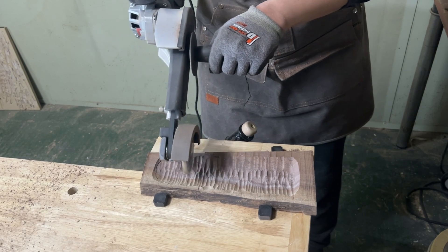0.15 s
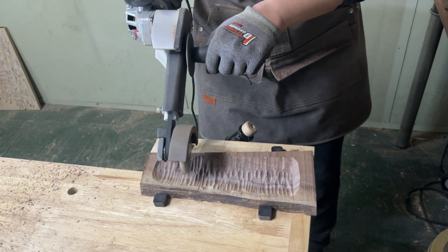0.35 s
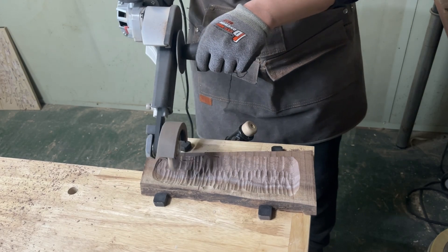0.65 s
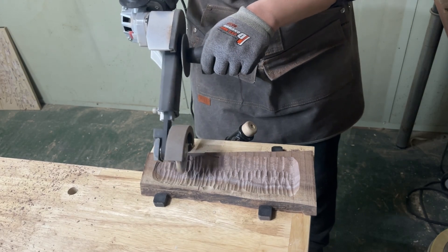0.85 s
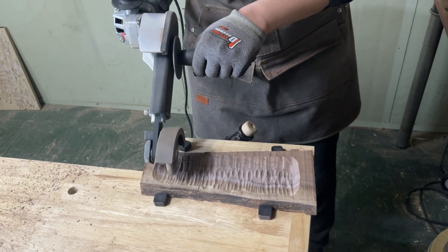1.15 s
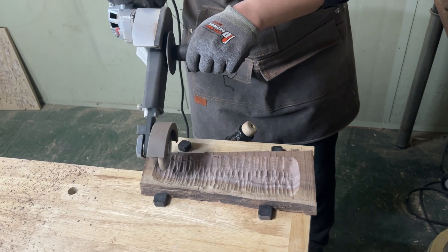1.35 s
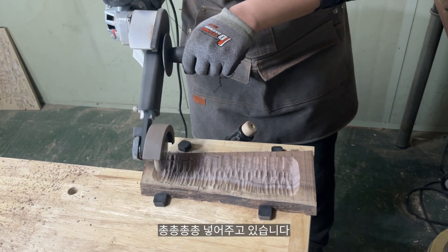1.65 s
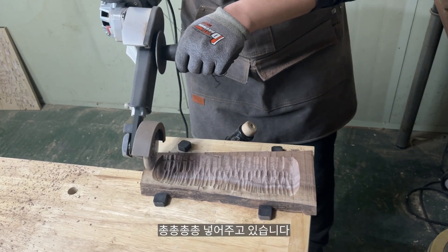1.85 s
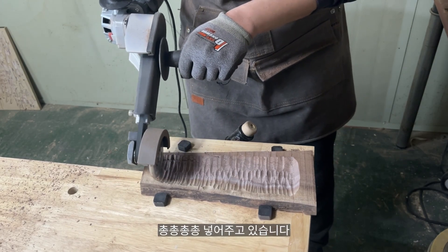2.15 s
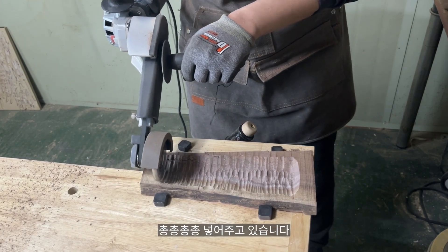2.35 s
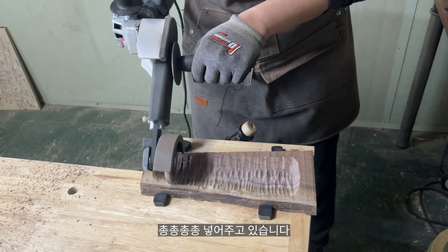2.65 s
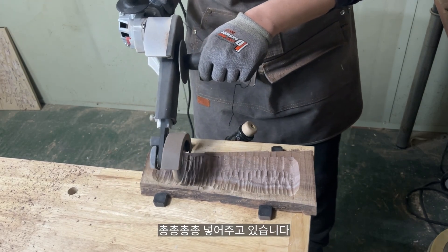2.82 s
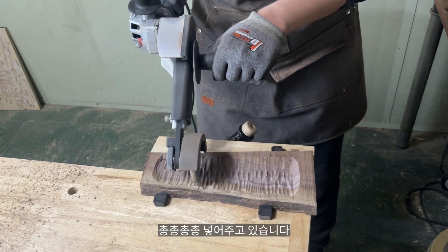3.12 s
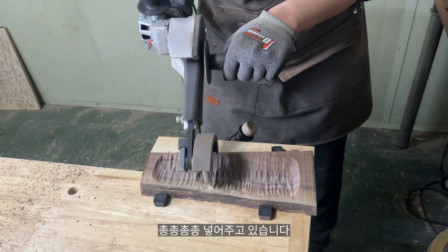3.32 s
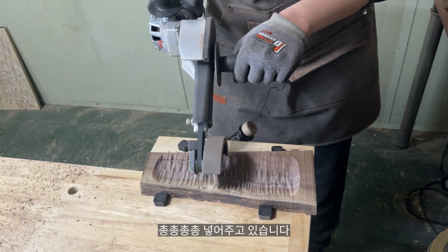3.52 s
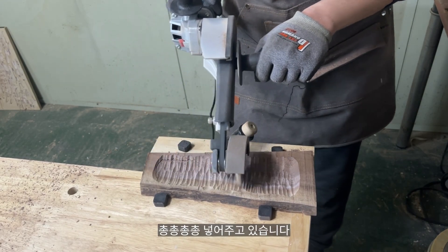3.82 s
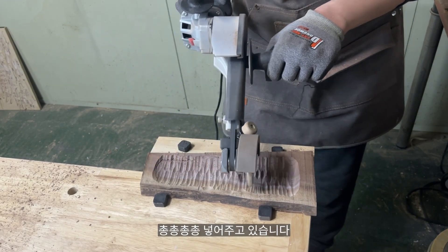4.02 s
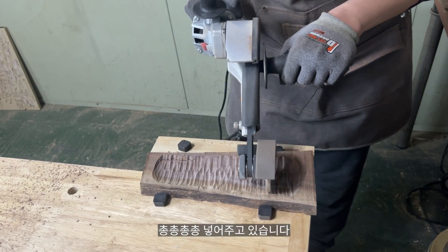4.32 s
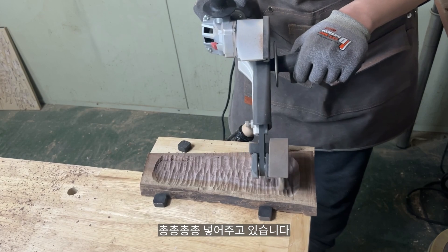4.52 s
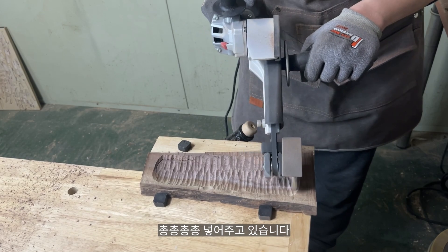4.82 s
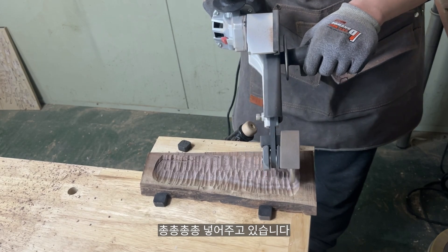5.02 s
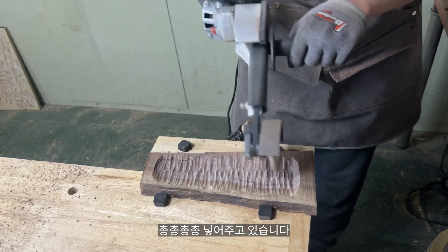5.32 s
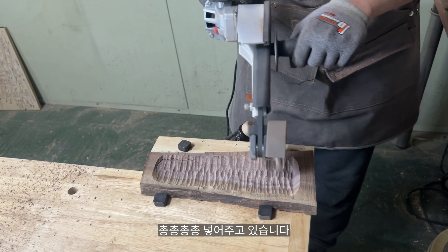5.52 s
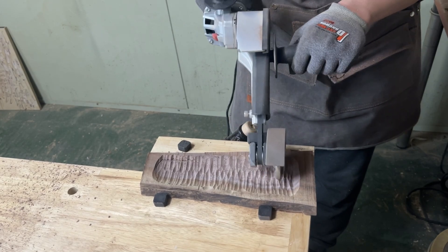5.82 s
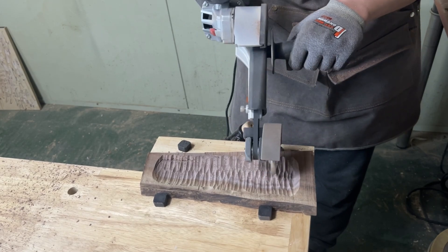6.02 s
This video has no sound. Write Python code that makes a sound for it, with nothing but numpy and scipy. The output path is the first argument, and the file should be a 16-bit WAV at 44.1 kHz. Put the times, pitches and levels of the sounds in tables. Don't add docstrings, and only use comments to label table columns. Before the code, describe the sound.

Close mono-like pickup of a power carver on wood: continuous turbulent hiss and faint piercing whine, with short woody brrt-like cuts on top. Widely spaced cuts come first, then a squealing hard group, a tiny scuff of the plank, a fast regular run of knocking bites, and finally light scattered dabs. Each cut briefly drags the motor down; a short, dull room reflection surrounds everything.

```python
import sys
import numpy as np
from scipy import signal
from scipy.fft import rfft, irfft, next_fast_len
from scipy.io import wavfile
from scipy.ndimage import uniform_filter1d

SR = 44100
rng = np.random.default_rng(int(sys.argv[2]) if len(sys.argv) > 2 else 0)


def bounce(signal):
    frames = np.transpose(np.atleast_2d(signal))
    limited = np.clip(frames, -1, 1)
    pcm = np.round(limited * 32767).astype(np.int16)
    wavfile.write(sys.argv[1], SR, pcm)


def voltage_ratio(decibels):
    exponent = np.asarray(decibels, float) / 20
    return 10 ** exponent


N = 272097


def rms_one(x):
    return x / np.sqrt(np.mean(x ** 2) + 1e-20)


def in_time(rows):
    seconds, *columns = np.transpose(rows)
    return [np.interp(np.arange(N) / SR, seconds, column) for column in columns]


def drift(rate_hz):
    r = np.exp(-80 * np.pi * rate_hz / SR)
    noise = rng.standard_normal(N // 40 + 2002)
    slow = signal.lfilter([1], [1, -2 * r, r * r], noise)[2000:]
    return np.interp(np.arange(N) / 40, np.arange(len(slow)), rms_one(slow))


def resonance(x, hz, width_hz):
    r = np.exp(-np.pi * width_hz / SR)
    zeros = np.array([1, 0, -1]) * (1 - r * r) / 2
    return signal.lfilter(zeros, [1, -2 * r * np.cos(2 * np.pi * hz / SR), r * r], x)


def body(x, modes):
    total = 0
    for k, (hz, width_hz, db) in enumerate(modes):
        total = total + (-1) ** k * voltage_ratio(db) * resonance(x, hz, width_hz)
    return total


def turns(hz):
    return 2 * np.pi * np.cumsum(hz) / SR


def workshop(x):
    size = next_fast_len(N + SR)
    hz = np.fft.rfftfreq(size, 1 / SR)
    t60_s = 0.2 / (1 + hz / 6000)
    echo = 0
    for k, lag_s in enumerate(rng.uniform(.009, .031, 8)):
        loop = voltage_ratio(-60 * lag_s / t60_s) * np.exp(-2j * np.pi * hz * lag_s)
        echo = echo + (-1) ** k * loop / (1 - loop)
    return irfft(rfft(x, size) * echo, size)[:N]


def ear_differences():
    per_second, level_db, width_hz = 5.7, -51, 1500
    side = np.zeros(N + 2048)
    swell = signal.windows.kaiser(2048, 4 * np.pi) ** .5
    for when, where, size in rng.random((round(per_second * N / SR), 3)):
        hz = 5200 + 9800 * where
        edges = [hz - width_hz / 2, hz + width_hz / 2]
        band = signal.butter(4, edges, "band", fs=SR, output="sos")
        noise = signal.sosfilt(band, rng.standard_normal(2048))
        at = 521 + 1024 * int(when * (N // 1024 - 1))
        side[at:at + 2048] += voltage_ratio(level_db + 8 * size - 3) * rms_one(noise) * swell
    return side[1024:N + 1024]


# centre in seconds, pitch in Hz, level in dB,
# half length in seconds.
SCUFFS = [
    (2.868, 275, -65, .025),
    (2.912, 350, -66, .018),
    (2.845, 500, -70, .025),
    (2.95, 500, -69, .012),
]


def scuffs():
    t, noise = np.arange(N) / SR, rng.standard_normal(N)
    total = 0
    for centre, hz, db, half in SCUFFS:
        rub = resonance(resonance(noise, hz, 189), hz, 204)
        total = total + voltage_ratio(db) * rms_one(rub) * np.exp(-((t - centre) / half) ** 2)
    return total


# frequency in Hz, density in dB per Hz.
HISS = [(59, -80), (100, -30), (159, -28), (387, -27), (1090, -17.5), (1320, -18), (1460, -16.5),
        (2640, -9.5), (2880, -5.5), (5420, 0.5), (6290, -2.5), (7930, 0), (13200, -7.5), (15600, -11)]
# frequency in Hz, width in Hz, level in dB.
HOUSING = [(5580, 350, -11), (6280, 320, -9), (13130, 1330, -2), (14400, 710, -8), (11540, 340, -10),
           (11360, 400, -15), (10600, 400, -10)]


def air_hiss(spindle, hiss_db, top_db, rumble_db, fan_db):
    out, together = 0, drift(6.0)
    edges = 50 * 2 ** np.arange(0, 8.5, 1 / 3)
    white = rng.standard_normal((2, N))
    hz, db = np.transpose(HISS)
    for k, (low, high) in enumerate(zip(edges, edges[1:])):
        third = signal.butter(2, [low, high], "band", fs=SR, output="sos")
        band = signal.sosfilt(third, white[k % 2])
        level_db = np.interp(np.log(low * high) / 2, np.log(hz), db)
        level_db = level_db + top_db * (low > 11000) + rumble_db * (high < 2500)
        out = out + band * voltage_ratio(level_db + 0.2 * together + 0.59 * drift(2.6))
    out = out + body(out, HOUSING) + voltage_ratio(fan_db - 7.5) * resonance(out, 8130, 450)
    sparks = voltage_ratio(0.53 * drift(200.0))
    throb = 1 + 0.068 * np.cos(spindle)
    return voltage_ratio(hiss_db - 0.5) * rms_one(out * sparks * throb)


GEAR_TEETH = 70
# multiple of the spindle speed, level in dB.
GEAR_ORDERS = [(1, -84), (14, -68.5), (21, -64.5)]
# multiple of the wheel speed, level in dB.
IDLE_ORDERS = [(2, -84), (6, -60), (8, -89)]


def whines(spindle, wheel, mesh_db, gear_db, idle_db):
    lines = [(GEAR_TEETH * spindle, mesh_db), (7 * spindle, gear_db), (3 * wheel, idle_db)]
    lines += [(order * spindle, db) for order, db in GEAR_ORDERS]
    lines += [(order * wheel, db) for order, db in IDLE_ORDERS]
    total = 0
    for phase, db in lines:
        level = np.sqrt(2) * voltage_ratio(db + 1.3 * drift(1.8))
        total = total + level * np.sin(phase + 0.11 * drift(32.0))
    return total


# start in seconds, ring level in dB,
# tooth-rate thud level in dB, chip hiss level in dB, length in seconds.
CUTS_END = [(.032, -26, -45, -34, .011), (.2626, -29, -45.5, -37, 0.018), (.497, -23, -47, -33.5, 0.0066),
            (.77, -27, -42, -29.5, .019), (.794, -33, -51, -36, .012), (.985, -23, -43, -29.5, .011),
            (.9986, -38, -51.5, -38.5, 0.012), (1.1673, -34.5, -48, -36, .017),
            (1.697, -41, -49, -35.5, 0.014), (1.9934, -37, -49, -36, 0.022),
            (2.1943, -31.5, -52.5, -34, .012)]
CUTS_KNOT = [
    (1.438, -28, -48, -30.5, 0.01),
    (2.208, -30.5, -52, -33.5, 0.022),
    (2.3604, -24, -44.5, -30, 0.0096),
    (2.503, -26, -47, -29.5, 0.0099),
    (2.522, -37, -56, -35, 0.0107),
    (2.6405, -21.5, -47, -30.5, 0.00629),
    (2.7661, -27, -51, -33, 0.0099),
]
CUTS_MIDDLE = [
    (2.8954, -28.5, -43.5, -34.0, 0.009),
    (3.029, -25.5, -45, -37.0, 0.0096),
    (3.143, -31, -49.0, -38.0, 0.022),
    (3.275, -28.5, -43, -33.5, 0.008),
    (3.3982, -26, -42.5, -34.0, 0.0074),
    (3.519, -33.5, -45.0, -36.0, 0.01149),
    (3.6327, -28, -44, -32, 0.0096),
    (3.744, -31.5, -49, -39, 0.011),
]
CUTS_FAR = [
    (3.8344, -35.5, -55.5, -37, 0.011),
    (3.9516, -27, -46.5, -33.5, 0.011),
    (4.0901, -29.5, -47, -36.5, 0.011),
    (4.21, -32, -45.0, -33.0, 0.011),
    (4.331, -31.5, -43.5, -36.5, 0.0098),
    (4.439, -30.5, -45.0, -35.0, 0.012),
    (4.54, -34.5, -44, -34.5, 0.01065),
    (4.64, -28.5, -43.5, -35, 0.0072),
    (4.7388, -26, -37, -32.5, 0.0064),
]
CUTS_LIGHT = [
    (4.8378, -36.0, -44.5, -38, 0.0061),
    (4.9456, -38, -50, -37, 0.012),
    (5.057, -35.5, -48, -37, 0.0069),
    (5.266, -41, -46.5, -45.5, 0.011),
    (5.29, -58, -52.5, -50, 0.0081),
    (5.6341, -39, -45, -37.0, 0.014),
    (5.836, -38, -48, -35.5, 0.017),
    (6.0667, -35, -40, -32, 0.01),
]
# plank ring in Hz, hollow knock level in dB, tooth unevenness 0-1.
STRETCHES = [
    (3100, -43, 0.78),
    (3440, -44, 0.8),
    (3178, -43.5, 0.55),
    (2597, -45.5, 0.67),
    (2700, -49, 0.34),
]


def all_cuts():
    runs = [CUTS_END, CUTS_KNOT, CUTS_MIDDLE, CUTS_FAR, CUTS_LIGHT]
    return [(*cut, *wood) for run, wood in zip(runs, STRETCHES) for cut in run]


def pressure(length, t, rise, fall):
    return np.clip(t / rise, 0, 1) * np.exp(-np.clip(t - length, 0, 1) / fall)


# time in seconds, gear whine in Hz.
FREE_SPEED = [(0, 11805), (.65, 11935), (1.2, 11960), (1.7, 11955), (2.2, 11985), (2.5, 11920),
              (3.2, 11885), (3.7, 11965), (4.2, 11915), (4.7, 11830), (5.1, 11935), (5.6, 11935),
              (6.17, 11925)]


def motor_hz():
    drag_hz, drag_in_s, recover_s = 87.5, .025, .17
    hz, t = in_time(FREE_SPEED)[0], np.arange(N) / SR
    for start, _, thud_db, chip_db, length, *_ in all_cuts():
        hardness = voltage_ratio(.62 * (thud_db + 46) + .5 * (chip_db + 35))
        drag = drag_hz * hardness * (length / .01) ** .73
        hz = hz - drag * pressure(0, t - start, drag_in_s, recover_s)
    return hz


def belt_slip():
    slip, t = np.zeros(N), np.arange(3500) / SR
    for start, _, thud_db, _, length, *_ in all_cuts():
        at = round(start * SR)
        lag = .007 * voltage_ratio(thud_db + 43) * pressure(length, t, .009, .005)
        slip[at:at + len(t)] += lag[:N - at]
    return np.clip(slip, 0, .04)


def tooth_blows(turn, uneven):
    orders = np.arange(1, 36)[:, None]
    share = np.where(orders % 3 == 0, 1, np.clip(uneven, .05, 1))
    grain = voltage_ratio(1.95 * rng.standard_normal(orders.shape))
    smear = 1.2 * rng.standard_normal(orders.shape)
    return rms_one(np.sum(share * grain * np.cos(orders * turn + smear), axis=0))


# start of the cut in seconds, pitch in Hz, level in dB.
SQUEALS = [(.032, 6620, -41), (.497, 5350, -34), (.77, 9270, -38), (1.167, 5270, -34), (1.438, 9200, -37.5),
           (1.438, 6800, -34.5), (2.208, 6570, -33.5), (2.36, 6630, -29), (2.36, 9400, -36),
           (2.503, 15040, -31), (2.522, 9000, -33), (2.641, 8730, -28), (2.641, 12100, -25),
           (2.765, 9310, -30.5), (2.765, 11920, -24), (3.029, 5265, -37), (3.143, 5310, -38),
           (3.275, 5290, -33.5), (3.399, 5294, -31.5), (3.519, 4780, -34.5), (3.744, 5280, -35),
           (3.834, 5330, -29.5), (3.834, 4000, -37), (3.952, 5270, -29), (4.21, 3480, -35),
           (4.331, 6620, -38), (4.54, 4060, -42), (4.54, 6600, -41), (4.64, 4040, -34.5),
           (4.739, 4024, -40)]


def guard_squeals(start, force):
    near = [row for row in SQUEALS if abs(row[0] - start) < .007]
    return sum(voltage_ratio(db + 8.5) * resonance(force, hz, 510) for _, hz, db in near)


# frequency in Hz, width in Hz, level in dB.
GUARD = [(4044, 300, 2), (5330, 240, 1.5), (6620, 420, 5), (8440, 560, 8), (9050, 1440, 5),
         (11870, 1030, 4), (14300, 2000, -1)]
PLANK = [(1275, 130, 2), (2246, 210, -0.5), (1810, 300, -7)]
HOLLOW = [(445, 22, -3), (940, 710, 1), (1230, 250, -8), (635, 220, -26)]
BENCH = [(163, 280, -14), (322, 340, -7.5), (560, 110, -3.5), (980, 214, 7.5), (1897, 45, 10)]


def cuts(wheel):
    out, t = np.zeros(N + 4000), np.arange(4000) / SR
    wheel = np.pad(wheel, (0, len(t)), "edge")
    for start, ring_db, thud_db, chip_db, length, ring_hz, hollow_db, uneven in all_cuts():
        at = round((start - .002) * SR)
        turn = wheel[at:at + len(t)]
        blows = tooth_blows(turn, uneven)
        tearing = rng.standard_normal(len(t)) * (1 + .8 * np.cos(turn))
        ragged = voltage_ratio(1.5 * rms_one(uniform_filter1d(rng.standard_normal(len(t)), size=130)))
        biting = blows + .2 * tearing
        splintering = blows + .6 * tearing
        force = biting * ragged * pressure(length, t, 0.007, 0.0039)
        entry = splintering * ragged * pressure(0.96 * length, t, 0.0016, 0.0052)

        double_ring = resonance(resonance(force, ring_hz, 590), ring_hz, 760)
        ring = voltage_ratio(ring_db + 5) * (resonance(force, ring_hz, 330) + 0.53 * double_ring)

        thud = voltage_ratio(thud_db + 14.5) * body(force, PLANK)
        trough_force = force + 0.27 * tearing * pressure(length, t, 0.0066, .005)
        knock_db = hollow_db + 0.49 * (thud_db + 45.5) + 5.5
        knock = voltage_ratio(knock_db) * body(trough_force, HOLLOW)

        struck = np.array(GUARD) + np.outer(rng.standard_normal(len(GUARD)), [0, 0, 1.5])
        chips = voltage_ratio(1.4 * (chip_db + 31.5) - 34) * body(entry, struck)
        squeal = guard_squeals(start, biting * pressure(length, t, 0.0036, .004))

        shaking = tearing * pressure(length, t, 0.0062, 0.013)
        jolt = voltage_ratio(1.32 * (chip_db + 28.0) - 39) * body(shaking, BENCH)
        out[at:at + len(t)] += ring + thud + knock + chips + squeal + jolt
    return out[:N]


# time in seconds, vents turned to the microphone 0-1, gear order level in dB.
STANCE = [(0, 0, -61), (.65, 0, -68), (.8, 0, -62), (1.2, .2, -62), (1.7, .35, -75), (2.15, .05, -74),
          (2.5, .1, -64), (3.2, .1, -61), (3.7, .5, -60), (4.2, .85, -56.5), (4.7, 1.0, -56),
          (5.1, .6, -56), (5.4, 0, -58), (5.8, .05, -58.5), (6.17, .05, -58)]


def scene():
    t, mesh_hz = np.arange(N) / SR, motor_hz()
    facing, gear_db = in_time(STANCE)
    spindle_hz = mesh_hz / GEAR_TEETH
    belt_ratio = 2.6386
    spindle = turns(spindle_hz)
    wheel = turns(spindle_hz * belt_ratio * (1 - belt_slip()))
    bites = cuts(wheel)

    hiss_db = -36.5 + 0.3 * facing + 0.107 * t
    top_db = 1.5 + .5 * t
    rumble_db = 1.56 - 0.5 * facing - 0.12 * t
    fan_db = 1 + 7.5 * facing
    hiss = air_hiss(spindle, hiss_db, top_db, rumble_db, fan_db)

    mesh_db = -54 - 11.0 * facing
    labour_hz = uniform_filter1d(mesh_hz, size=round(0.17 * SR)) - 11900
    idle_db = -57 + 3 * labour_hz / 100
    grinder = hiss + whines(spindle, wheel, mesh_db, gear_db, idle_db)

    room = workshop(voltage_ratio(-11) * bites + voltage_ratio(-17.5) * grinder)
    return np.tile(grinder + scuffs() + bites + room, (2, 1))


def roll_off(x):
    return signal.sosfilt(signal.butter(12, 16960, fs=SR, output="sos"), x)


def record(dry):
    mix = .22 * np.tanh(dry / .22)
    mix = signal.sosfilt(signal.butter(2, 110, "high", fs=SR, output="sos"), mix)
    mix = mix + ear_differences() * [[1], [-1]]
    mix = signal.sosfilt(signal.ellip(12, .3, 70, 15750, fs=SR, output="sos"), mix)
    return roll_off(mix)


dry = scene()
out = record(dry)
bounce(out)
```